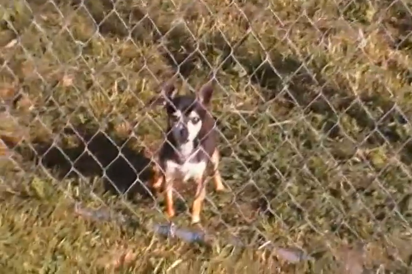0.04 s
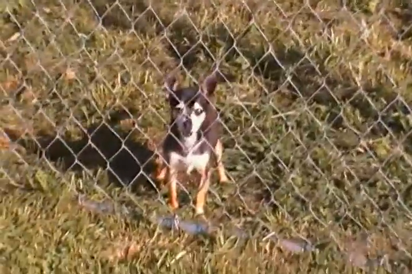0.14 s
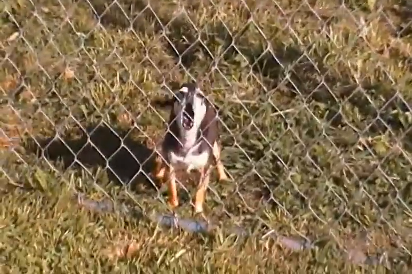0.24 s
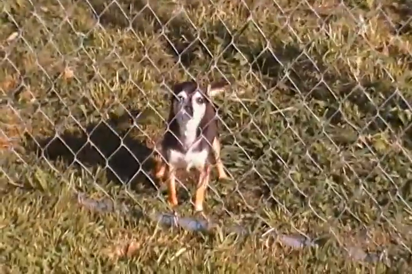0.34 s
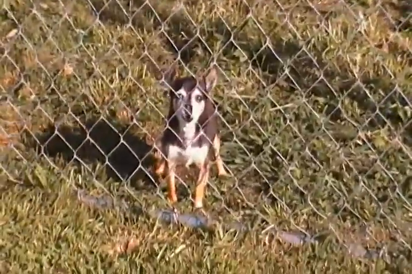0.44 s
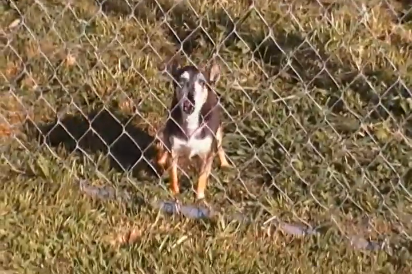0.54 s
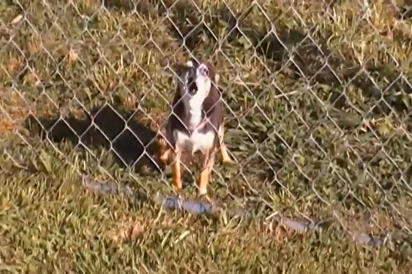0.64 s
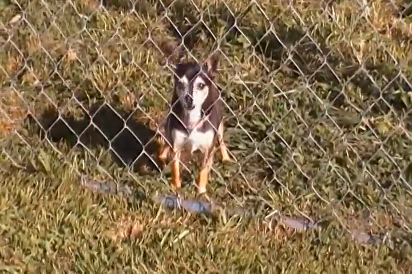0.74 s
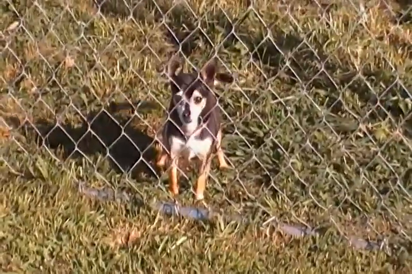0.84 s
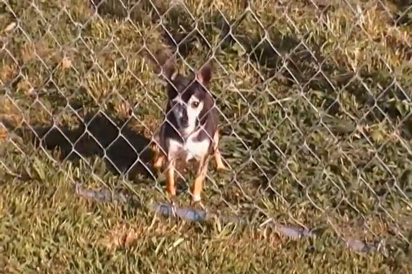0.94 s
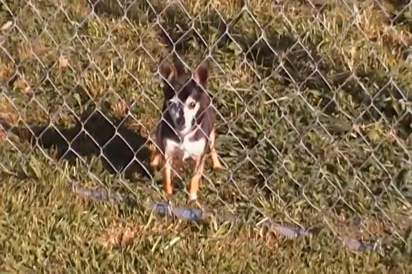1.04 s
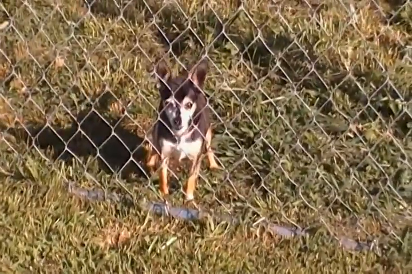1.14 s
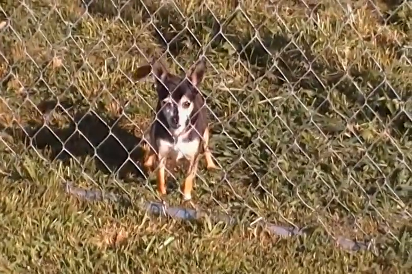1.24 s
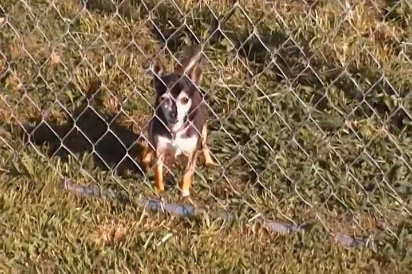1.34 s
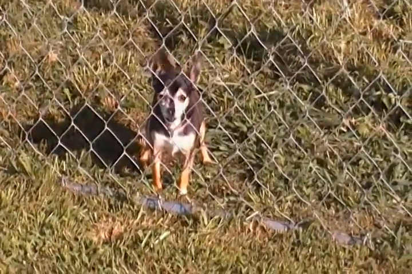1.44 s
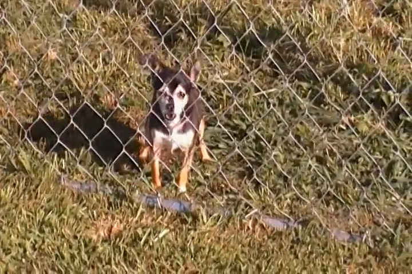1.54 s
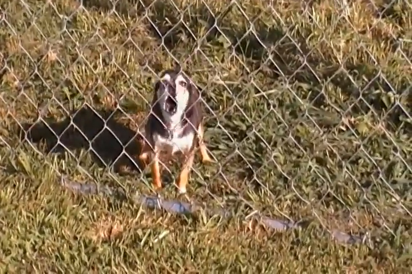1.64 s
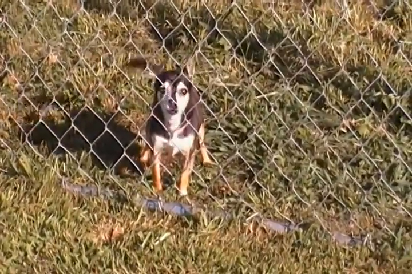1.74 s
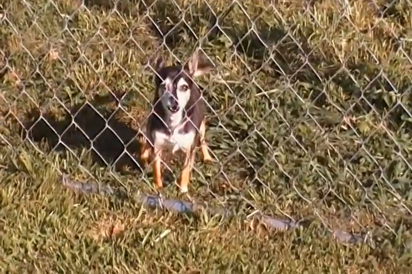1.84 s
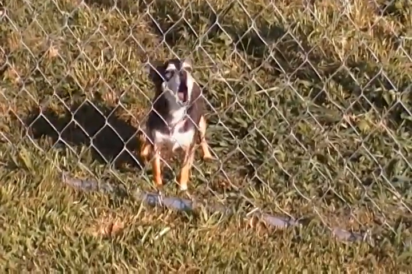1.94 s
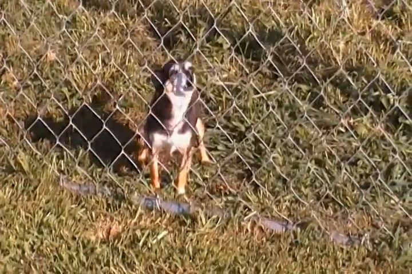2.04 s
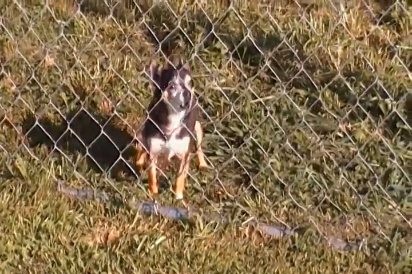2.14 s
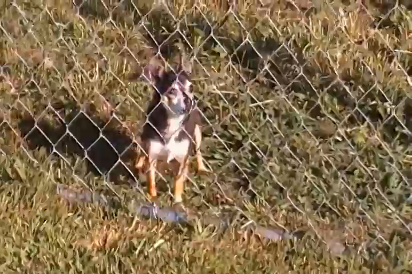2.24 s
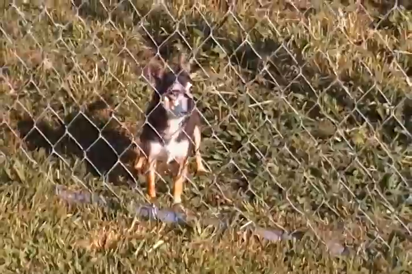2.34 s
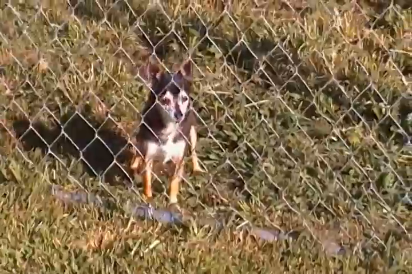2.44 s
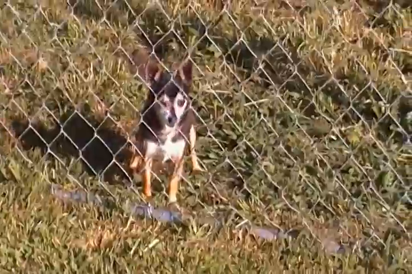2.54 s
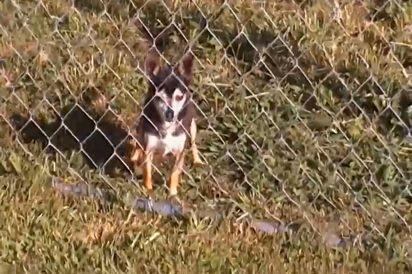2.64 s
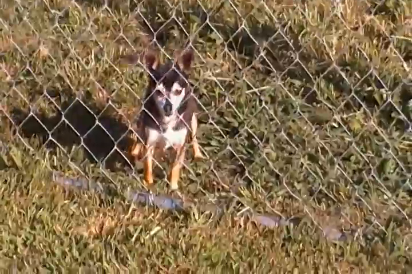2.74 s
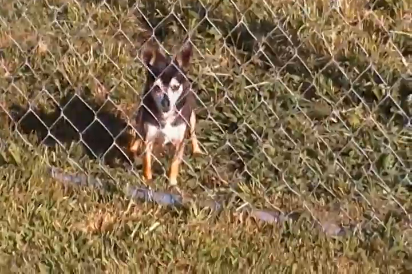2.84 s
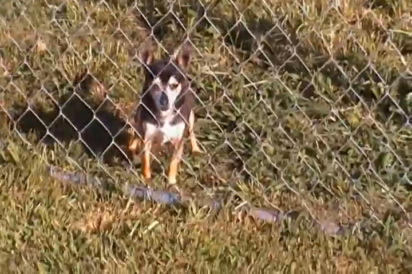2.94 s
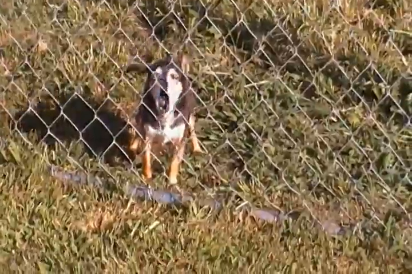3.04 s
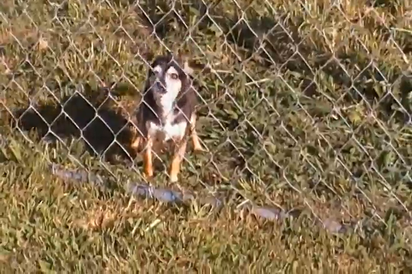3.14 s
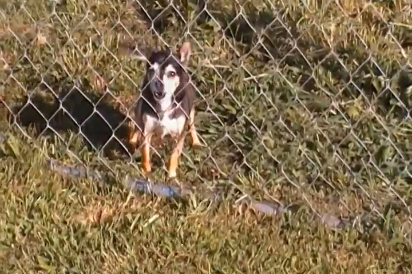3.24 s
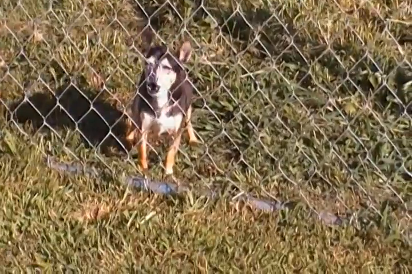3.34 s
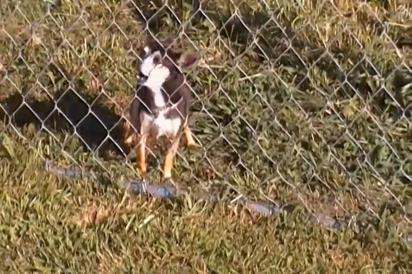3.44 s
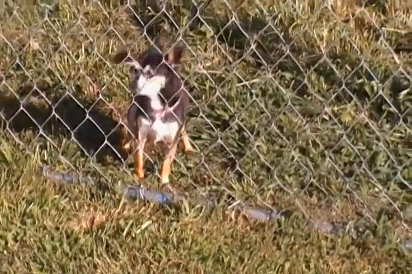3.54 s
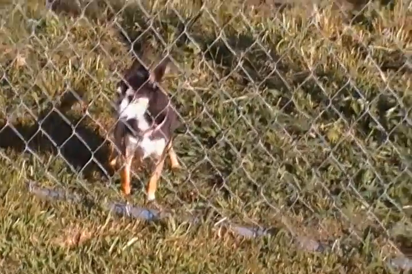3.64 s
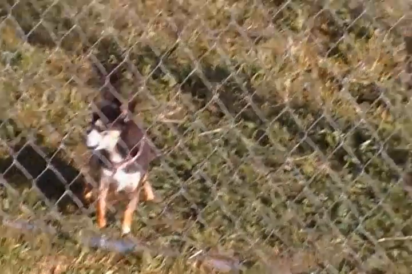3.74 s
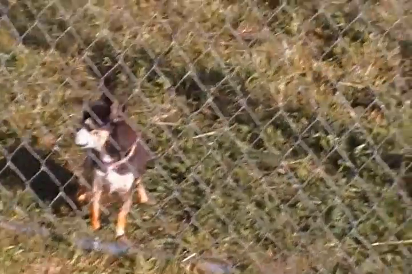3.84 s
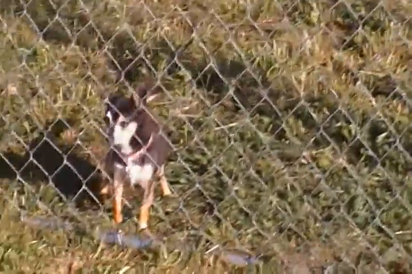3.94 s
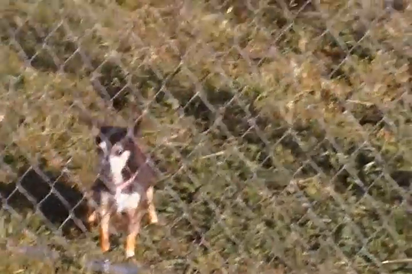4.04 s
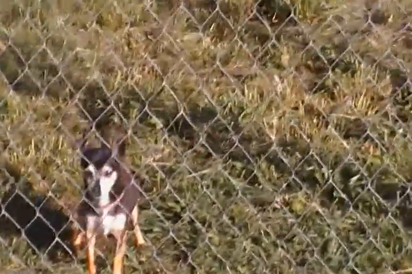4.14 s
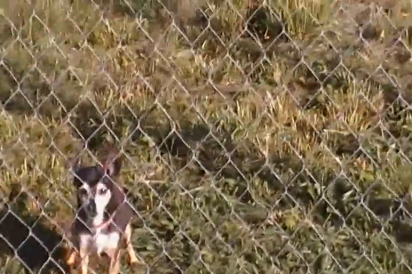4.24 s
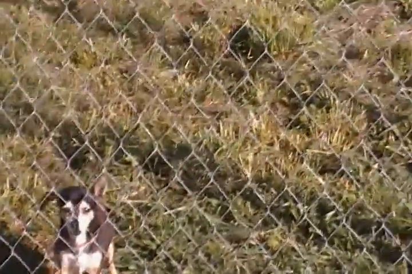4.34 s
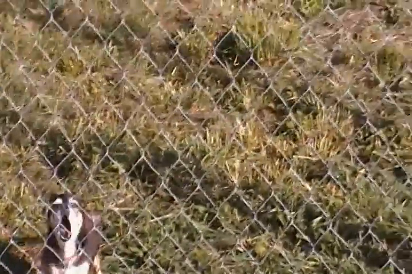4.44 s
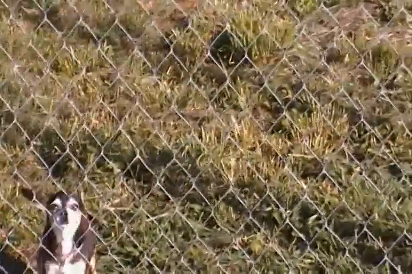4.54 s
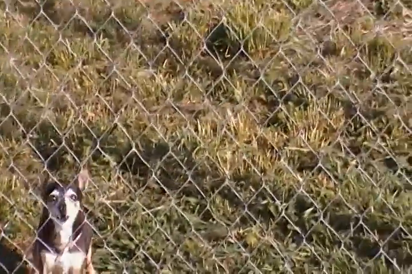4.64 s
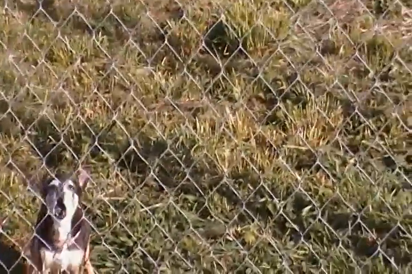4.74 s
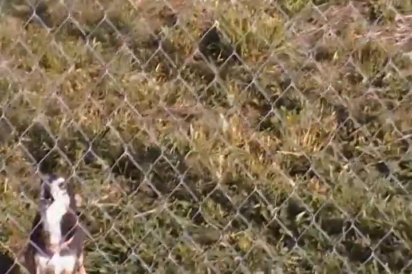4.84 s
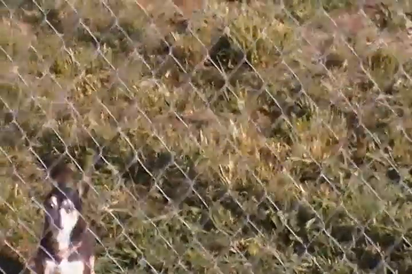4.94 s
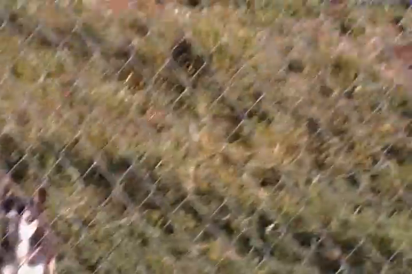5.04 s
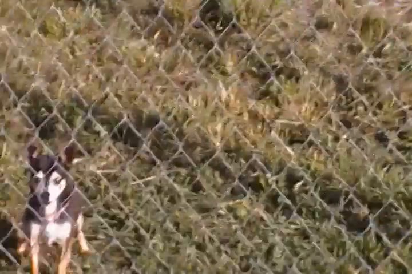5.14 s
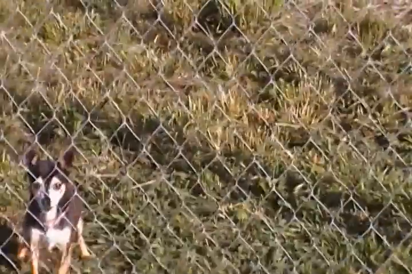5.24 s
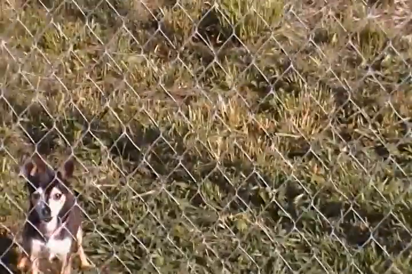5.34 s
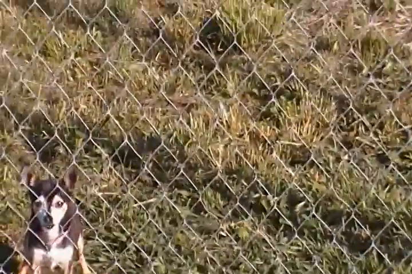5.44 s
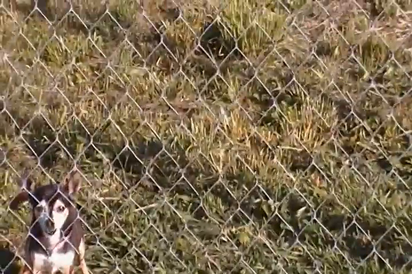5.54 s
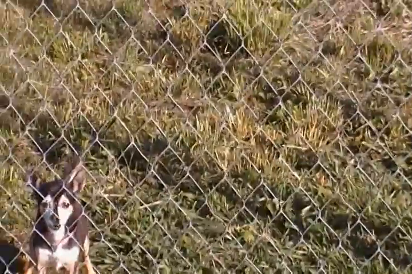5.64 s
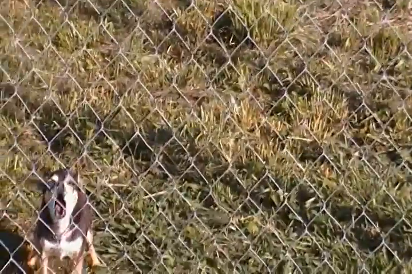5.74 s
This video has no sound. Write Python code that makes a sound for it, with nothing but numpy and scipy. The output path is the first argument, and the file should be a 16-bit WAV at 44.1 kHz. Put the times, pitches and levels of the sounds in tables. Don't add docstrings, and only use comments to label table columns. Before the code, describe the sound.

A small dog barks sharply in short volleys outdoors, whistling thinly through its nose between them, with birds, insect buzz and wind bumps.

```python
import sys
import numpy as np
from scipy import signal
from scipy.io import wavfile
from scipy.ndimage import uniform_filter1d

SR = 44100
rng = np.random.default_rng(int(sys.argv[2]) if len(sys.argv) > 2 else 0)


def master(y):
    cut = np.clip(np.atleast_2d(y).T, -1, 1)
    pcm = np.round(cut * 32767)
    wavfile.write(sys.argv[1], SR, pcm.astype(np.int16))


def linear_from_db(decibels):
    return 10 ** (np.asarray(decibels, float) / 20)


N = 254897
T = np.arange(N) / SR

# f/Hz, density/dB per Hz
HUM = [(76, -31), (130, -9.5), (259, -8), (902, -15.5), (1480, -16.5), (1760, -23), (4260, -19),
       (5260, -18.5), (6140, -21.5), (10500, -22.5), (12000, -26.5), (12700, -40), (16500, -70),
       (22000, -120)]
# f/Hz, likeness/share
LIKENESS = [(60, 0.84), (170, 0.69), (500, 0.83), (1460, 0.77), (4230, 0.55), (12300, 0.064)]
# t/s, half length/s, level/dB
RUSTLES = [(.02, 0.45, -50.5), (1.9, 0.22, -56.5), (2.17, 0.074, -52), (2.7, 0.13, -47),
           (3.65, 0.07, -52.5), (4.25, 0.91, -69.5), (5.4, 0.067, -47.5), (5.75, 0.12, -53)]
# t/s, half length/s, level/dB
GUSTS = [(.07, 0.037, -42), (.74, 0.021, -39), (1.2, 0.14, -38.5), (1.37, 0.013, -33), (1.8, 0.047, -20),
         (2.12, 0.062, -36.5), (2.3, 0.052, -34), (2.52, 0.061, -31.5), (2.7, 0.077, -36), (3.25, .06, -45),
         (5.45, 0.087, -48), (4.99, 0.035, -23.5), (5.2, 0.062, -39.5)]
# start t/s, end t/s, first f/Hz, last f/Hz, level/dB
NOTES = [(0.893, 0.982, 3010, 2397, -28.5), (0.958, 1.1, 2460, 2670, -37.5),
         (1.294, 1.355, 3940, 5100, -38), (1.294, 1.373, 3300, 4130, -40), (1.395, 1.46, 5640, 3900, -31.5),
         (1.467, 1.517, 4470, 5450, -35), (3.525, 3.613, 3280, 3470, -34.5), (1.33, 1.377, 4640, 3900, -39),
         (3.82, 3.907, 3404, 3280, -38), (3.893, 3.969, 3005, 2490, -32.5), (3.938, 4.063, 2460, 2706, -36),
         (5.22, 5.29, 10100, 11030, -39), (5.324, 5.362, 10800, 11400, -35),
         (2.58, 2.7, 10650, 10600, -40),
    (.005, .055, 4950, 4750, -32),
    (.04, .1, 8350, 8700, -39),
]
# t/s, level/dB
CHIPS = [
    (4.174, -43),
    (4.272, -40),
    (5.12, -48),
    (5.217, -84),
    (5.309, -75),
    (5.4, -33),
    (5.492, -40),
    (5.587, -39),
]
# start t/s, end t/s, level/dB
INSECT = [(3.77, 3.84, -51), (3.938, 3.983, -47), (4, 4.037, -45.5), (4.045, 4.072, -44.5),
          (4.075, 4.097, -54), (4.101, 4.156, -46), (4.172, 4.2, -47.5), (4.224, 4.26, -50.5),
          (4.265, 4.313, -47)]
# t/s, peak level/dB, grass crack/dB, ring/s
PAWS = [
    (2.876, -39, -24, 0.0052),
    (3.264, -41.5, -12, 0.0053),
    (3.676, -44, 0, 0.049),
    (3.752, -39.5, -2, 0.0052),
    (3.817, -60, 17, 0.0034),
    (5.319, -23, -34, 0.0058),
]
# delay/s, spread/s, level/dB
WALLS = [
    (.04, 0.056, -20),
    (0.203, 0.0084, -31),
    (0.296, 0.18, -62),
]
# t/s, f/Hz, level/dB
WHISTLES = [
    [(0.885, 8900, -62), (0.891, 8340, -59), (0.923, 8481, -45.5), (0.987, 8554, -44.5), (1.015, 8786, -45),
     (1.047, 8520, -42.5), (1.133, 8358, -46), (1.175, 8435, -57), (1.185, 8200, -71)],
    [(2.25, 8600, -68), (2.26, 8443, -52), (2.284, 8470, -51), (2.298, 8400, -69), (2.32, 8700, -47),
     (2.382, 8820, -39), (2.418, 9110, -35), (2.47, 8800, -34.5)],
    [(2.47, 8952, -34.5), (2.556, 8830, -40.5), (2.578, 9032, -40.5), (2.642, 9106, -51), (2.66, 9400, -60)],
    [(3.51, 8650, -55), (3.532, 8700, -70), (3.536, 9019, -58), (3.59, 9044, -45.5), (3.606, 9100, -47),
     (3.636, 8800, -39.5), (3.654, 8350, -41), (3.698, 8480, -45.5), (3.72, 8600, -60)],
    [(5.09, 8760, -55), (5.098, 8520, -49), (5.132, 8630, -42), (5.182, 8900, -40.5), (5.222, 8790, -39),
     (5.286, 9250, -50), (5.298, 9237, -57), (5.308, 9200, -77), (5.315, 9100, -73)],
    [(5.32, 9400, -67), (5.35, 8919, -41.5), (5.364, 8600, -41), (5.464, 8300, -35), (5.482, 8218, -39),
     (5.496, 8100, -65), (5.51, 8251, -61)],
]
# t/s, f/Hz, level/dB
PEEPS = [
    [(2.665, 9000, -63), (2.683, 9100, -42), (2.705, 8737, -39), (2.723, 8700, -57), (2.73, 8419, -69)],
    [(3.448, 8502, -67), (3.458, 7900, -45), (3.47, 7952, -43), (3.494, 8140, -44), (3.51, 8640, -64)],
    [(3.9, 8899, -69), (3.91, 8801, -62), (3.944, 9150, -45.5), (3.956, 9400, -49), (3.968, 10000, -59)],
    [(4.052, 9700, -54), (4.058, 9814, -48), (4.07, 9152, -40), (4.12, 9177, -40.5), (4.148, 9089, -48),
     (4.17, 9166, -71)],
]
# t/s, f/Hz, level/dB
WHISTLE_EDGES = [
    [(.998, 10760, -62), (1.015, 10870, -41), (1.035, 10870, -62)],
    [(3.57, 10800, -48), (3.6, 10780, -53), (3.635, 10600, -54)],
]
# start t/s, end t/s, first rate/Hz, last rate/Hz, first level/dB, last level/dB
GROWLS = [
    (0.486, 0.5124, 170.9, 299, -21, -0.5),
    (2.9539, 2.978, 180.8, 266.4, -16, -0.5),
    (4.363, 4.381, 205.8, 279.3, -12.5, -1.5),
    (4.6918, 4.714, 248.9, 235.7, -26.5, 0),
    (5.6676, 5.6832, 194.4, 325.5, -12.5, -4),
]
# f/Hz, width/Hz, level/dB
GROWL_THROAT = [(1373, 440, 7.5), (2070, 660, -22.5), (3430, 960, -14.5), (5280, 1500, -12.5),
                (7500, 390, -11)]
# f/Hz, width/Hz, level/dB
THROAT = [(1360, 430, 5), (3300, 434, -6.5), (5190, 350, -14.5), (6870, 410, -11.5), (7940, 220, -33),
          (10100, 1700, -24.5)]
# f/Hz, width/Hz
NOTCHES = [(2547, 170), (4610, 160), (5750, 500), (7550, 1080)]
# level at each of four/dB, more at the lowest in the fall/dB
POCKETS = [(0.5, -3, 3, -5, -6), (2.3, -4.5, -4, -7, 8), (0.81, -4.5, 3.5, -2.5, 3),
           (4.3, -4.5, 2.5, -11.5, 12), (0.55, -10, 6.5, -6.5, -2), (3.1, -8, -3, -10, 0),
           (5.7, -2, 1, -17, 7.5), (2.8, 4, -6, -11, -11), (0.39, -7, 9, -16.5, 28)]
# level near 3 kHz/dB, near 5 kHz/dB, near 6.5 kHz/dB, above/dB
UPPERS = [(2.5, -16, 0.5, -22), (3.5, 1, -8, -0.5), (2.5, -2.5, -5, -9), (0, -1, 3, 4), (5, -1, -9, 4),
          (8.5, -5, 2, 13), (1, 0, -14, -7), (0.5, -10, -3, 11), (2.5, 7, 11, 11.5)]
# start t/s, first f/Hz, jump t/s, f before/Hz, f after/Hz
RISES = [(.118, 868, .178, 1428, 1615), (.511, 1180, .530, 1470, 1526), (1.517, 770, 1.548, 1323, 1511),
         (1.872, 749, 1.902, 1216, 1385), (2.9775, 1215, 2.993, 1437, 1506),
         (4.3835, 1204, 4.393, 1445, 1420), (4.7178, 1265, 4.742, 1526, 1520),
         (5.684, 1400, 5.698, 1420, 1430)]
ATTACKS_S = [0.02, 0.0021, 0.00703, 0.00732, 0.0018, 0.0028, 0.0026, 0.0024]
JUMPS_S = [0.0047, 0.0088, 0.0054, 0.0028, 0.0067, .007, 0.0087, .007]
# fall t/s, f there/Hz, level/dB, top against hold/dB
HOLDS = [(0.247, 1565, -9, -1), (0.591, 1487, -9, 2), (1.622, 1591, -10, 0.5), (1.977, 1496, -12, 10),
         (3.071, 1535, -9.5, 2), (4.463, 1465, -8.5, -0.5), (4.802, 1449, -8.5, -3),
         (5.766, 1409, -9.5, -3.5)]
# t/s, f/Hz, level against hold/dB, strain for rasp and overtone lag/dB
STRAINS = [(0.202, 1590, 0.5, -21), (0.558, 1464, -0.5, -13.5), (1.578, 1522, 0.5, -7),
           (1.926, 1518, 6, -18.5), (3.032, 1471, -1.5, -4), (4.423, 1428, -2, -3),
           (4.768, 1445, -7, -10.5), (5.735, 1395, -3, -7.5)]
STRAIN_ROUGH = [.22, .15, .28, .22, .4, .6, .45, .65]
CREAKS = [.04, .04, .12, .04, .2, .7, .25, .7]
# mid-glide sag/share, fall stretch/ratio, late fall level/dB, fall brightness/dB per octave
ENDINGS = [(0.0335, 1.1, 6, -5), (0.0043, 1.05, 0.5, -0.5), (-0.0128, 1.05, 2.5, -1),
           (-0.0033, 0.97, 3.5, -2.5), (-0.017, .9, 2.5, 4), (0.011, .85, 2.5, 1.5), (0.0074, 0.97, 1, -3),
           (0.00064, 0.81, 2, -4)]
# t after hold/s, f/Hz, level under hold/dB, overtone slope/dB per octave
FALL = [
    (.011, 1330, -1.5, -11),
    (.02, 1203, -3.5, -8.5),
    (0.03, 1068, -17.5, 0.5),
    (.05, 780, -42.5, -62),
]
# mouth f/Hz, mouth level/dB, true power over gain control/dB,
# first level against rise/dB, rise brightness/dB per octave
COLOURS = [(2060, 2, -3, -13.5, 5), (1830, -7, -3, 18, 2.5), (1970, -25, -3.7, -10, 5),
           (1900, -5, -3, 4, 5), (1810, -11, -5.5, 5, 6.5), (2089, -7, -7.5, 15, -1.5),
           (2010, 2, -2.5, 25.5, 4.5), (1900, 15, 7.5, 23, -1.5)]
# hold brightness/dB per octave, breath/dB, rasp/dB, treble near the fall/dB
AIRS = [(2, 3, 4.5, 3), (.5, -1.5, 6, 7), (4.5, 1.5, -2.5, 1.5), (1.5, -3, 4.5, 9), (3, -6.5, 1.5, -2.5),
        (-2, -1, 3, 1), (-5, 1.5, 4, 8), (3, -2.5, 1, -1), (.5, 4, -3, 1)]
# t/s, f/Hz, level/dB, overtone slope/dB per octave
YELP = [(3.33, 786, -20, 0), (3.338, 793, -15, -0.5), (3.362, 864, -10, 1.5), (3.385, 912, -9.5, 0),
        (3.4, 955, -10, -1), (3.409, 1002, -19, -3.5), (3.426, 988, -23, -7.5), (3.438, 930, -36, -17)]
# t/s, half length/s, level/dB, shift/Hz
SLIPS = [(0.164, 0.012, -2.5, 0), (.182, 0.0017, 3, 27), (.228, 0.009, 1, 0), (0.254, .004, -1, 0),
         (1.557, 0.0016, -6, 47), (1.649, 0.0033, 0, -2), (1.906, 0.0029, -4, -1.5),
         (1.575, 0.0012, -7, -35), (1.928, 0.0037, -1.5, 89.5), (3.002, .004, -1.5, -0.5),
         (3.022, 0.0023, -5, 95.5), (3.047, 0.0023, 2.5, -55), (3.08, 0.0022, -0.5, -8),
         (4.399, .003, -4, -2.5), (4.403, 0.0053, -3.5, -130), (4.423, 0.0039, -3.5, -40),
         (4.416, 0.0034, -3.5, 152.5), (4.437, 0.0044, -0.5, 48.5), (4.449, 0.0029, -5.5, -65.5),
         (4.75, .0025, -7, 3), (4.77, 0.0035, -1.5, -56), (4.773, 0.0029, 3, 41), (4.814, 0.0035, -6, 53),
         (5.696, 0.0029, 3.5, 29), (5.701, 0.0022, -6, -3), (5.719, 0.0022, -1, 0),
         (5.732, 0.0018, -5, -60), (5.737, .002, 5, -2), (5.704, 0.0042, 1, 152),
         (5.749, 0.0085, -3.5, -89), (5.776, 0.0066, -1.5, 3)]
# start t/s, end t/s, f/Hz, level/dB
FOLDS = [(.19, 0.215, 461.4, -21), (0.549, 0.59, 444, -18), (1.556, 1.611, 471, -15),
         (1.938, 1.952, 480, -18), (2.992, 3.064, 462, -12.5), (4.38, 4.46, 465, -12),
         (4.743, 4.794, 461, -15), (5.695, 5.76, 466, -11), (3.366, 3.37, 465, -41)]
# t/s, half length/s, level/dB
CLEARINGS = [(0.167, 0.0062, 11.5), (0.243, .008, -1), (1.54, 0.0076, 1), (1.61, 0.0099, 5),
             (1.916, .009, 18), (1.99, .005, 0), (2.982, 0.0047, -16), (.608, 0.0053, 8),
             (4.818, 0.0055, 4)]

MOUTH_WIDTH_HZ, MOUTH_DB, MOUTH_PER_SLOPE = 84, -12, 0.45
CLEAR_FOLD_DB = -35


def rms_one(x):
    return x / np.sqrt(np.mean(x ** 2) + 1e-20)


def band(x, low_hz, high_hz, order=2):
    sos = signal.butter(order, [low_hz, min(high_hz, SR / 2.2)], "band", fs=SR, output="sos")
    return signal.sosfilt(sos, x)


def bump(x, centre, half):
    return np.exp(-.5 * ((x - centre) / half) ** 2)


def played(rows):
    s, *columns = np.transpose(rows)
    span = slice(int(s[0] * SR), min(int(s[-1] * SR), N))
    return [span] + [np.interp(T[span], s, c) for c in columns]


def at_hz(points, hz):
    f_hz, value = np.array(points).T
    return np.interp(np.log(hz), np.log(f_hz), value)


def drift(rate_hz):
    r = np.exp(-2 * np.pi * rate_hz / SR)
    return rms_one(signal.lfilter([1], [1, -2 * r, r * r], rng.standard_normal(N + SR))[SR:])


def resonate(x, hz, width_hz):
    r = np.exp(-np.pi * width_hz / SR)
    poles = [1, -2 * r * np.cos(2 * np.pi * hz / SR), r * r]
    return signal.lfilter(np.array([1, 0, -1]) * (1 - r * r) / 2, poles, x + 1e-18)


def panned(x, left_db):
    return np.array([x * linear_from_db(left_db / 2), x * linear_from_db(-left_db / 2)])


def swells(rows, rest_db):
    return linear_from_db(rest_db) + sum(linear_from_db(db) * bump(T, s, half) for s, half, db in rows)


def tones(tables, waver_db, drift_share):
    out, unsteady, wander = np.zeros(N), drift(49), drift(48)
    for rows in tables:
        span, hz, db = played(rows)
        fade = np.hanning(len(hz)) ** 0.026
        phase = 2 * np.pi * np.cumsum(hz * (1 + drift_share * wander[span])) / SR
        out[span] += np.sqrt(2) * fade * linear_from_db(db + waver_db * unsteady[span]) * np.sin(phase)
    return out


def lingering():
    after = sum((T > s) * np.exp(-np.maximum(T - s, 0) / 0.81) for s, *_ in RISES)
    earlier = linear_from_db(-34) * np.exp(-T / 0.083)
    return linear_from_db(-49) + linear_from_db(-58) * after + earlier


def yard():
    flicker_db = 1.4
    levels = [swells(RUSTLES, rest_db=-58), lingering(), linear_from_db(-47.5)]
    edges_hz = 130 * 2 ** (np.arange(21) / 3)
    white = rng.standard_normal((2, 2, N))
    out = 0
    for k, (low, high) in enumerate(zip(edges_hz, edges_hz[1:])):
        mid, side = band(white[k % 2], low, high)
        hz = np.sqrt(low * high)
        alike = np.clip(at_hz(LIKENESS, hz), 0, 1)
        hum_db = at_hz(HUM, hz) - 3.6 * (hz > 5700) + 21
        gain = levels[int(hz > 1000) + int(hz > 4000)] * linear_from_db(hum_db + flicker_db * drift(26.0))
        out = out + gain * (np.sqrt(1 + alike) * mid + np.sqrt(1 - alike) * side * [[1], [-1]])
    far_ring = rms_one(resonate(resonate(white[0, 0], 1478, 85), 1478, 85))
    return out + levels[1] * linear_from_db(-3.0 + flicker_db * drift(81)) * far_ring


def wind():
    lumps = rms_one(band(np.cumsum(rng.standard_normal((3, N)), axis=1), 33.1, 115.0))
    lumps = lumps * linear_from_db(np.array([5 * drift(18) for _ in range(3)]))
    return rms_one(lumps[:2] + .45 * lumps[2]) * swells(GUSTS, rest_db=-54)


def smeared(x):
    age = T[:SR // 4]
    trail = rng.standard_normal(len(age)) * np.exp(-age / .04)
    return x + linear_from_db(-5) * signal.fftconvolve(x, trail / np.sqrt(np.sum(trail ** 2)))[:N]


def wildlife():
    chips = [[(s, 6500, db - 14), (s + 0.006, 7000, db), (s + 0.023, 7300, db - 14)] for s, db in CHIPS]
    notes = []
    for start, end, hz0, hz1, db in NOTES:
        middle = ((start + end) / 2, (hz0 + hz1) / 2, db)
        notes.append([(start, hz0, db - 9), middle, (end, hz1, db - 9)])
    far = tones(notes + chips, waver_db=3.5, drift_share=.014)
    bursts = sum(linear_from_db(db) * (T > start) * (T < end) for start, end, db in INSECT)
    wings = rms_one(resonate(resonate(rng.standard_normal(N), 4730, 710), 2500, 980))
    buzz = uniform_filter1d(bursts, size=200) * wings
    return panned(linear_from_db(-13) * smeared(far) + buzz, 3.9)


def paws():
    thud = rms_one(band(rng.standard_normal(N), 130, 650))
    crack = rms_one(band(rng.standard_normal(N), 1300, 8800))
    out = np.zeros(N)
    for s, db, crack_db, ring_s in PAWS:
        age = np.maximum(T - s, 0)
        envelope = (1 - np.exp(-age / 0.00015)) * np.exp(-age / abs(ring_s))
        out += linear_from_db(db + 4.5) * envelope * (thud + linear_from_db(crack_db) * crack)
    return out


def echoes(x):
    tail_db, t60_s, least_spread_s = -10, 0.75, .014
    age = T[:2 * SR]
    tail = linear_from_db(tail_db - 60 * age / t60_s) * np.minimum(age / 0.0037, 1)
    walls = sum(linear_from_db(db) * bump(age, lag, max(spread, least_spread_s)) for lag, spread, db in WALLS)
    noise = band(rng.standard_normal((3, len(age))), 916, 3740)
    noise = noise[2] + .35 * noise[:2]
    bright = linear_from_db(3) * (band(noise, 1980, 4270) + 2.2 * band(noise, 3800, 8500, order=1))
    response = 0.049 * ((tail + walls) * noise + (walls + 0.087 * tail) * bright)
    return signal.fftconvolve(x[None], response)[:, :N]


def ground(x):
    age = T[:SR // 40]
    scatter = band(rng.standard_normal((2, len(age))), 3600, 10800, order=3) * np.exp(-age / .005)
    scatter /= np.sqrt(np.sum(scatter ** 2, axis=1, keepdims=True))
    age = T[:SR // 2]
    shimmer = rms_one(band(rng.standard_normal((2, len(age))), 7260, 11900))
    shimmer = shimmer * linear_from_db(-24 - 60 * age / 0.35)
    response = np.pad(scatter, [(0, 0), (0, len(age) - scatter.shape[1])]) + shimmer
    return linear_from_db(-17) * signal.fftconvolve(x[None], response)[:, :N]


def ducking(loud):
    attack, release = 1 / (.035 * SR), 1 / (.045 * SR)
    over = uniform_filter1d(np.abs(loud), size=600) > .12
    falling = signal.lfilter([attack], [1, attack - 1], over)
    rising = signal.lfilter([release], [1, release - 1], falling)
    return np.maximum(falling, rising)


def whistles():
    flow = np.zeros(N)
    for rows in WHISTLES + PEEPS:
        flow[played(rows)[0]] = 1
    flow = uniform_filter1d(uniform_filter1d(flow, size=4000) > .2, size=1500, output=float)
    hiss = rms_one(band(rng.standard_normal((2, N)), 8300, 12000))
    pitch = tones(WHISTLES + PEEPS + WHISTLE_EDGES, waver_db=0.77, drift_share=0.0017)
    return panned(pitch, 11) + linear_from_db(-61.5) * flow * (hiss[0] + 0.85 * hiss)


def growls():
    clicks, dull = np.zeros(N), np.ones(N)
    for start, end, rate0, rate1, db0, db1 in GROWLS:
        middle = ((start + end) / 2, (rate0 + rate1) / 2, (db0 + db1) / 2 + 1)
        span, hz, db = played([(start, rate0, db0), middle, (end, rate1, db1)])
        cycle = np.floor(np.cumsum(hz) / SR)
        dull[span] = linear_from_db(np.linspace(-8, 0, len(hz)))
        clicks[span] -= np.diff(cycle, prepend=-1) * linear_from_db(db)
    puffs = signal.lfilter([1], [1, -.985], clicks) * rng.standard_normal(N)
    spikes = band(clicks, 410, 1600, order=1)
    soft = band(clicks + 0.11 * puffs, 280, 4500, order=1)
    rings = 0
    for hz, width, db in GROWL_THROAT:
        rings = rings + linear_from_db(db) * resonate(soft * (dull if hz > 3000 else 1), hz, width)
    chest = linear_from_db(-14.5) * resonate(clicks, 234, 181.0)
    return 1.5 * spikes + 12 * rings + 70 * chest


def bark_course(rise, jump_s, attack_s, strain, rough, hold, ending, broken, air, first_db, bright):
    start, first, jump, before, after = rise
    worst, strained, strain_db, fold_db = strain
    end, last, db, top_db = hold
    sag, stretch, late_db, fall_bright = ending
    held, _, _, clear_db = air
    rising = max(.25, 2 * broken - .7) * rough
    voiced = first + .23 * (before - first)
    attacked, rise_db, clear = start + attack_s, db + 0.16, CLEAR_FOLD_DB
    middle, middle_hz = (attacked + jump) / 2, (voiced + before) / 2 * (1 - sag)
    rows = [(start, first, rise_db + first_db, -6, rising, clear, -5, 0),
            (attacked, voiced, rise_db, bright - 0.54, rising, clear, -5, 0),
            (middle, middle_hz, db + 2, bright - 0.076, rising, clear, -2.5, 0),
            (jump, before, db + 3, bright, rising, clear, 0, 0),
            (jump + jump_s, after, db + top_db, held - 5.5, rough, fold_db - 18, -2, broken),
            (worst, strained, db + strain_db, held - 5, rough, fold_db, -2, broken),
            (end - .012, last, db, held - 5, rough / 2, fold_db - 13, -2, broken),
            (end, last - 30, db, held - 6.5, .3 * rough, fold_db - 21, 16 + clear_db, 0)]
    late_s = FALL[2][0]
    fall_rough = .09 + .35 * broken ** 2
    for s, hz, under_db, slope in FALL:
        fall_db = db + under_db + late_db * s / late_s
        treble_db = clear_db + (19 if s < late_s else 16.5)
        rows.append((end + s * stretch, hz, fall_db, slope + fall_bright, fall_rough, clear, treble_db, 0))
    return rows


def calls():
    yelp = [row + (0.006, CLEAR_FOLD_DB, -5.0, 0) for row in YELP]
    parts = zip(RISES, JUMPS_S, ATTACKS_S, STRAINS, STRAIN_ROUGH, HOLDS, ENDINGS, CREAKS, AIRS, COLOURS)
    found = [(bark_course(*part, *colour[3:]), colour[:3]) for *part, colour in parts]
    return found + [(yelp, (1900, 11.2, -27.5))]


def throat(x):
    modes = sorted(THROAT + [(np.mean(COLOURS, axis=0)[0], MOUTH_WIDTH_HZ, MOUTH_DB)])
    return sum((-1) ** k * linear_from_db(db) * resonate(x, hz, width) for k, (hz, width, db) in enumerate(modes))


def throat_gain(hz, mouth_hz, mouth_db, upper, pocket):
    lifts = [0, *upper, upper[-1]]
    modes = [(top, width, db + lift) for (top, width, db), lift in zip(THROAT, lifts)]
    modes.append((mouth_hz, MOUTH_WIDTH_HZ, mouth_db))
    pockets = sum(db * bump(hz, *notch) for notch, db in zip(NOTCHES, pocket))
    power = sum(linear_from_db(db) ** 2 / (1 + ((hz - top) / width * 2) ** 2) ** 1.166 for top, width, db in modes)
    return linear_from_db(pockets) * np.sqrt(power)


def patchy(x, edges_hz):
    edges = zip(edges_hz, edges_hz[1:])
    return rms_one(sum(band(x, low, high) * linear_from_db(4 * drift(28)) for low, high in edges))


def throat_air():
    air = rng.standard_normal(N)
    breath = patchy(throat(np.diff(air, prepend=0)), np.geomspace(850, 9500, 8))
    high = resonate(resonate(air, 3200, 450), 3200, 420)
    low = resonate(resonate(air, 1100, 340), 1560, 270)
    rasp = rms_one(high + 0.56 * low)
    return band(np.array([breath, rasp]), 1150, 14000, order=4)


def creak():
    rate_hz = 250 * (1 + .4 * np.tanh(drift(60)))
    cycle = np.floor(np.cumsum(rate_hz) / SR)
    beats = np.diff(cycle, prepend=0) * linear_from_db(3 * rng.standard_normal(N))
    r = np.exp(-1 / (.0035 * SR))
    return rms_one(uniform_filter1d(signal.lfilter([1], [1, -r], beats), size=20))


def overtone_sizes(order, hz, slope, treble_db, gain, patches):
    f_hz = order * hz
    source_db = slope * np.log2(order) ** 0.95 + treble_db / (1 + (5600 / f_hz) ** 8)
    sizes = gain * linear_from_db(source_db) / (1 + (f_hz / 7800) ** 5)
    sizes *= linear_from_db(5 * np.clip(order - 2, 0, 2) / 2 * patches)
    return sizes / np.sqrt(np.sum(sizes ** 2, axis=0) / 2)


def barks():
    out, power = np.zeros(N), np.ones(N)
    wobble, swell = drift(66) + 0.0076 * drift(770), np.tanh(drift(99))
    unsteady, uneven = 1.0 * drift(39) + 0.5 * drift(158), drift(32.0)
    (breath, rasp), beats = throat_air(), creak()
    order = np.arange(1, 15)[:, None]
    for (rows, colour), upper, pockets, air, fold in zip(calls(), UPPERS, POCKETS, AIRS, FOLDS):
        mouth_hz, open_db, power_db = colour
        low_db, *pocket, fall_db = pockets
        _, air_db, rasp_db, _ = air
        opens, shuts, fold_hz, fold_db = fold
        span, hz, db, slope, rough, second_db, treble_db, broken = played(rows)
        t = T[span]
        hz = hz + sum(shift_hz * bump(t, s, half) for s, half, _, shift_hz in SLIPS)
        db = db + sum(slip_db * bump(t, s, half) for s, half, slip_db, _ in SLIPS)
        treble_db = treble_db + sum(clear_db * bump(t, s, half) for s, half, clear_db in CLEARINGS)
        phase = 2 * np.pi * np.cumsum(hz) / SR + 1.3 * rough * wobble[span]

        pocket = [low_db + fall_db * np.clip((t - shuts) / .02, 0, 1)] + pocket
        mouth_db = open_db + MOUTH_PER_SLOPE * slope
        gain = throat_gain(order * hz, mouth_hz, mouth_db, upper, pocket)
        patches = uneven[(np.arange(span.start, span.stop) + 9973 * order) % N]
        sizes = overtone_sizes(order, hz, slope, treble_db, gain, patches)

        edge = np.clip(np.minimum(t - opens, shuts - t) / .004 + .5, 0, 1)
        folding = linear_from_db(CLEAR_FOLD_DB) + linear_from_db(fold_db) * edge
        beat = folding * np.exp(1j * (2 * np.pi * fold_hz * t + 2.5 * rough.max() * unsteady[span]))
        depth = np.minimum(order, 2) ** 1.7
        split = np.exp(depth * beat) / np.sqrt(np.i0(2 * depth * folding))
        lag = .07 + .5 * np.clip((second_db - CLEAR_FOLD_DB) / 10, 0, 1)
        voice = -np.sum(sizes * np.real(np.exp(1j * order * (phase - lag * order)) * split), axis=0)
        voice *= np.maximum(1 + .5 * rough * swell[span], 0)

        breath_gain = linear_from_db(-34.5 + air_db + 0.044 * slope) * (1 + 7 * rough)
        gated = breath[span] * (1 - 1.0 * np.cos(phase)) * breath_gain
        rasp_gain = (linear_from_db(-9 + second_db) + linear_from_db(-12) * rough) * linear_from_db(rasp_db)
        fade = np.minimum(np.arange(len(hz)) / 120, 1)
        fade *= 1 - broken + broken * beats[span]
        out[span] += fade * linear_from_db(db) * (voice + gated + rasp_gain * rasp[span])
        power[span] = linear_from_db(power_db + 2 * np.exp(-(t - t[0]) / 0.025))
    lowest = signal.butter(4, 680, "high", fs=SR, output="sos")
    return signal.sosfiltfilt(lowest, out), power


def scene():
    voice, power = barks()
    dog = voice + growls()
    loss = ducking(dog * power)
    around = linear_from_db(-17 * loss) * (yard() + wildlife() + paws())
    returns = linear_from_db(-24 * loss) * echoes(dog * power)
    return panned(dog, 0.9) + ground(dog) + returns + around + linear_from_db(-8 * loss) * wind() + whistles()


def band_limit(x):
    return signal.sosfilt(signal.butter(12, 12870, fs=SR, output="sos"), x)


def record(dry):
    knee = .72
    squeezed = dry - 0.44 * (dry - np.clip(dry, -knee, knee))
    dulled = signal.sosfilt(signal.butter(6, 11800, fs=SR, output="sos"), squeezed)
    return band_limit(np.clip(dulled, -1, 1))


dry = scene()
out = record(dry)
master(out)
```